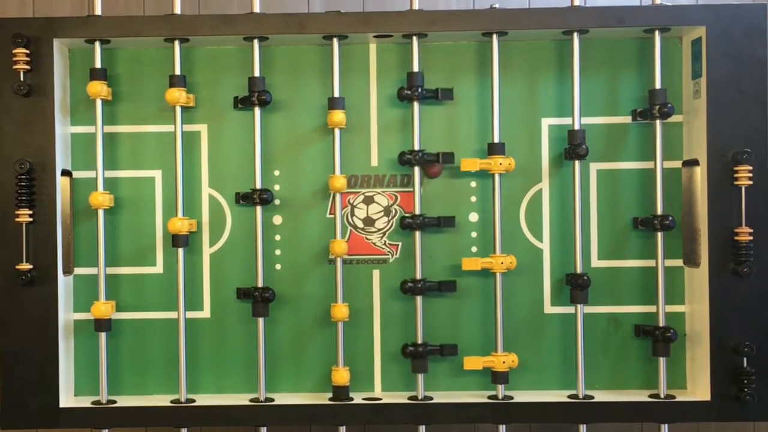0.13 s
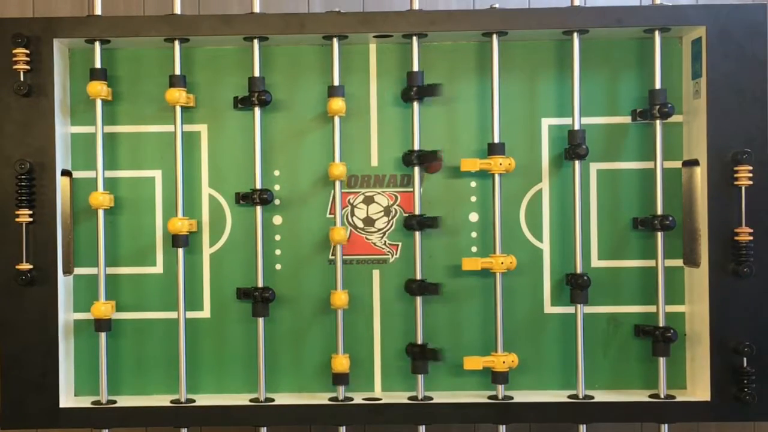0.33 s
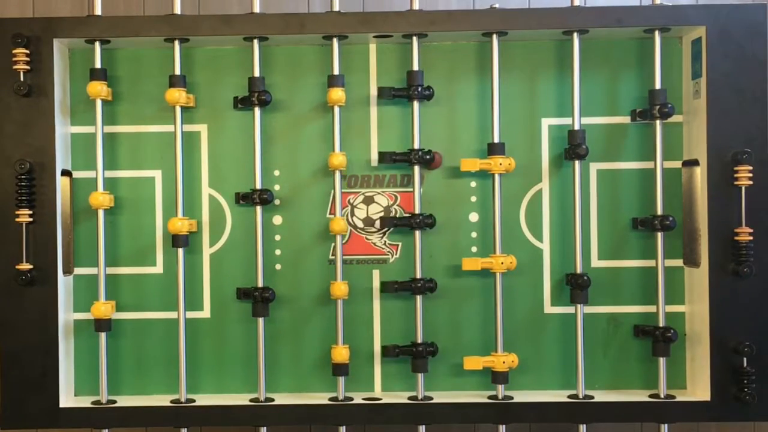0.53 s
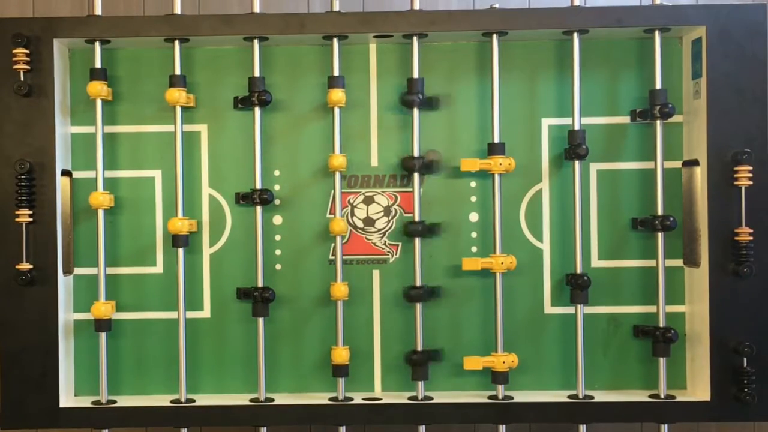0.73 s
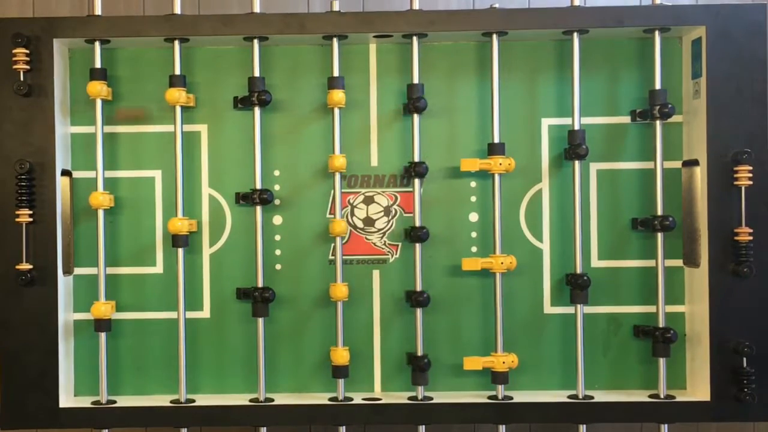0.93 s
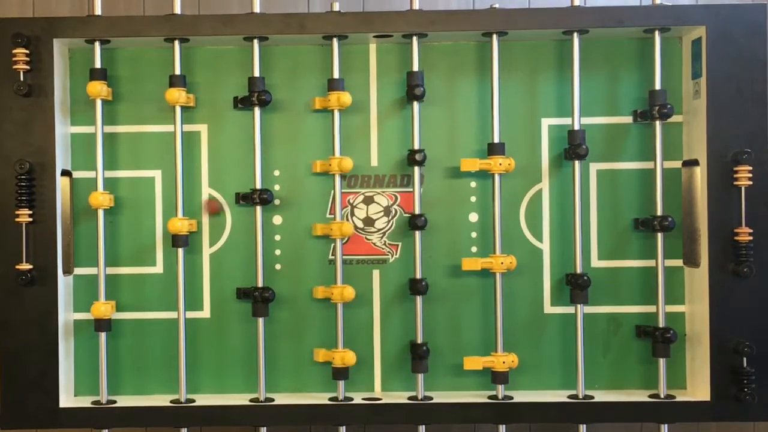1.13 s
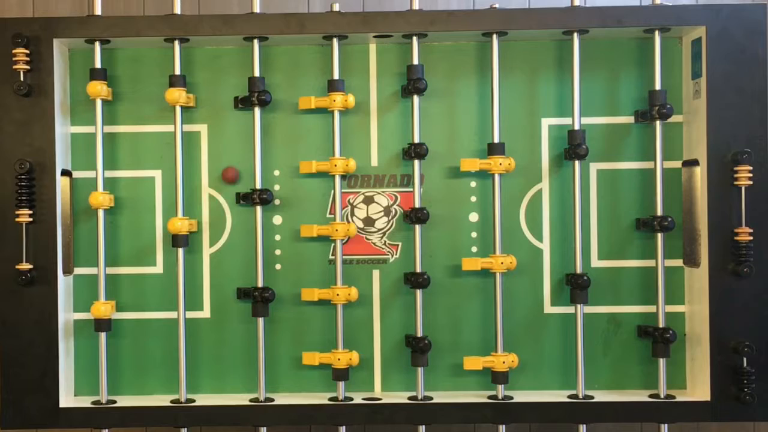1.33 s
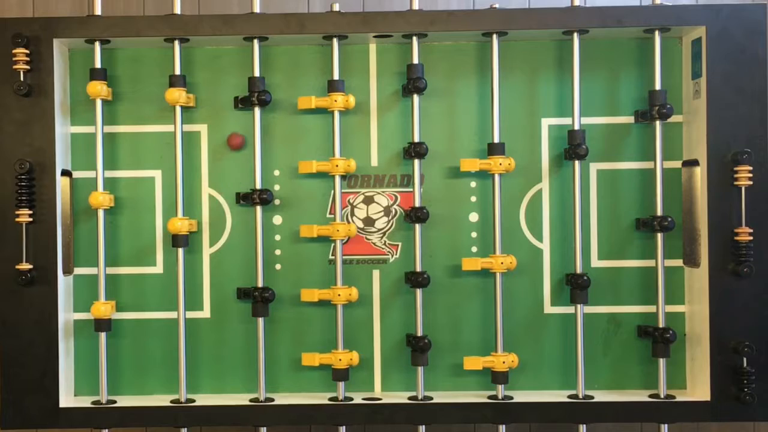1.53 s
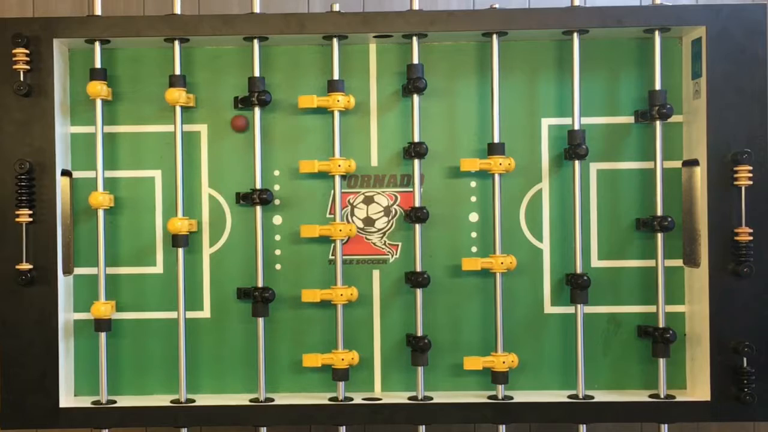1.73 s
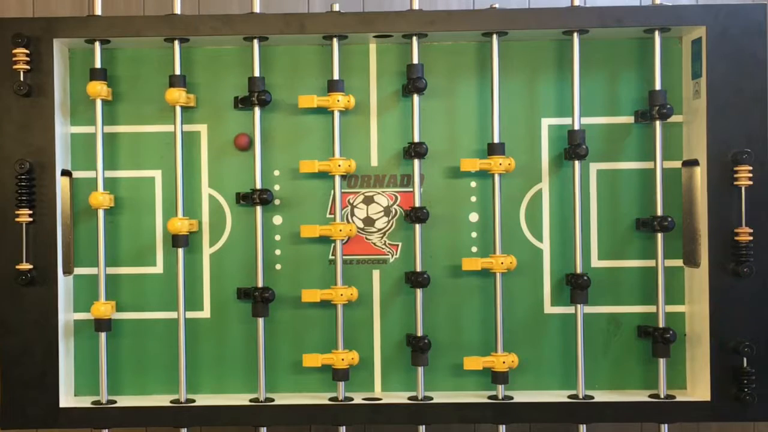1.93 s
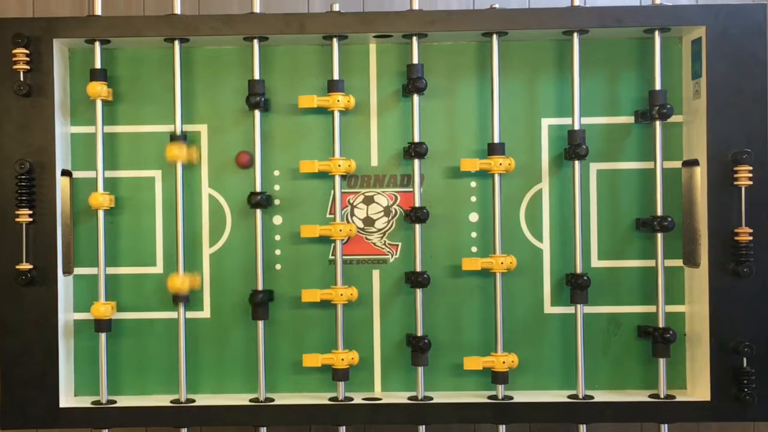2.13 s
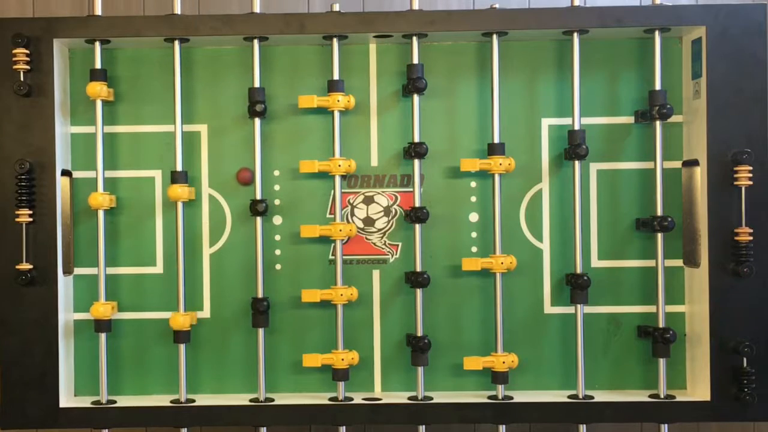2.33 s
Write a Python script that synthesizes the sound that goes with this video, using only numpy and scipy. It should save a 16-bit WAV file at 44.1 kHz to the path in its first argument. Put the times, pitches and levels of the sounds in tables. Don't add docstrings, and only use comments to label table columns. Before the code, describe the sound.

A foosball shot cracks hard with a cabinet boom, then fading knocks bounce quickly to a roll

```python
import sys
import numpy as np
from scipy import signal
from scipy.io import wavfile
from scipy.ndimage import uniform_filter1d

SR = 44100
rng = np.random.default_rng(int(sys.argv[2]) if len(sys.argv) > 2 else 0)


def transcribe(signal):
    frames = np.atleast_2d(signal).T
    limited = np.clip(frames, -1, 1)
    pcm = np.round(limited * 32767).astype(np.int16)
    wavfile.write(sys.argv[1], SR, pcm)


def voltage_ratio(level):
    return 10 ** (np.asarray(level, float) / 20)


N = 109941

# (time [s], peak [dB], crack [dB], brightness [dB per octave], contact cut [Hz])
SHOT_BLOWS = [
    (0.7972, 1.995, -4.5, 0.67, 17770),
]
# (time [s], peak [dB], crack [dB], brightness [dB per octave], contact cut [Hz])
BLOCK_BLOWS = [
    (0.964, 0.998, -9, 0.3, 3980),
]
# (time [s], peak [dB], crack [dB], brightness [dB per octave], contact cut [Hz])
FIELD_BLOWS = [
    (1.068, -9.5, -31, 2.5, 3570),
    (1.216, -11, -14.5, 1, 2800),
    (1.3785, -13, -12.5, 0.4, 2500),
    (1.485, -16.5, -18.5, 0.8, 2410),
    (1.559, -22.5, -29, 1.2, 2250),
    (1.617, -22.5, -30, -0.7, 1890),
    (1.656, -27.5, -28, -2.5, 1760),
    (1.686, -32, -30, -5, 1720),
    (1.71, -38, -22.5, -4, 1706),
]

# (frequency [Hz], level [dB per Hz])
SHOT_COLOUR = [(60, -22), (150, -20), (280, -6), (500, -9), (2050, -22.5), (2630, -41), (3740, -23),
               (8770, -42), (16000, -55)]
# (frequency [Hz], level [dB per Hz])
BLOCK_COLOUR = [(100, -17.5), (300, -5), (900, -2), (1450, -3), (2300, -10), (3200, -6.5), (6000, -7.5),
                (16000, -27)]
# (frequency [Hz], level [dB per Hz])
FIELD_COLOUR = [(100, 4), (300, 4.5), (600, 5), (1200, 5.5), (2000, -2), (3000, -9.5), (4300, -17.5),
                (6500, -21), (16000, -31.5)]

# (frequency [Hz], level [dB], T60 [s])
CABINET_MODES = [(54.2, -7.5, 0.21), (383, -20, 0.15), (640, -19.5, 0.15), (191.1, -15.5, 0.202),
                 (252.6, -13, 0.09), (294, -13, 0.18), (439, -7.5, 0.02), (520, -18.5, 0.15),
                 (774, -18, 0.13), (1059, -18.5, 0.12), (4200, -18.5, 0.06), (3500, -24.5, 0.0089)]
# (frequency [Hz], level [dB], T60 [s])
FIGURE_MODES = [(270, -23, 0.051), (636, -21, .1), (860, -9.5, 0.066), (1129, -10.5, 0.047),
                (1263, -13, 0.085), (3300, -24, 0.025), (2970, -13.5, 0.011), (6300, -33, 0.02)]
# (frequency [Hz], level [dB], T60 [s])
FIELD_MODES = [(81.5, -20, 0.41), (220, -9, 0.078), (295.5, -12.5, 0.24), (389.6, -19.5, 0.24),
               (530.4, -12, 0.082), (586.2, -14.5, 0.22), (649, -17, 0.22), (843, -21, 0.18),
               (1065, -4.5, 0.03), (1270, -32, 0.087), (1386, -17.5, 0.18), (1724, -10, 0.035),
               (2060, -26, 0.028), (6760, -48.5, 0.18)]
# (frequency [Hz], T60 [s])
WOOD_DECAY = [(100, 0.3), (500, 0.018), (1500, 0.031), (4000, 0.013), (12000, 0.036)]
# (frequency [Hz], T60 [s])
ROOM_DECAY = [(60, 0.75), (300, 0.45), (1100, 0.44), (3000, 0.24), (8000, 0.31), (15000, 0.26)]
# (time [s], frequency
# [Hz], level [dB], T60 [s])
SHORT_RINGS = [(0.7976, 4110, -9, 0.024), (.802, 1956, -19, 0.061), (0.803, 3960, -14, 0.022),
               (.806, 576, -5, 0.062), (.808, 782, -9, 0.074), (.824, 457, -11.5, 0.053),
               (.826, 640, -10.5, 0.062), (.849, 520, -16.5, 0.086), (.853, 93.6, -14.5, 0.26),
               (0.879, 320, -17.5, 0.067), (0.887, 95, -19, .1), (.968, 1860, -22.5, .04),
               (0.9692, 2980, -15, 0.022), (0.973, 3300, -14.5, 0.022), (.976, 294, -17.5, 0.083),
               (1.069, 2330, -15, .03), (1.215, 2750, -21.5, 0.021), (1.2165, 570, -10.5, .04),
               (1.217, 1094, -9.5, 0.024), (1.22, 1940, -14.5, 0.031), (1.222, 2420, -21.5, .025),
               (1.239, 610, -15.5, 0.037), (1.38, 940, -17, 0.057), (1.384, 1790, -14, 0.032),
               (1.39, 796, -18.5, .04), (1.397, 6500, -42, 0.017), (1.488, 1764, -25, .03)]

# (time [s], level [dB])
ROLL_LEVEL = [(1.45, -85), (1.56, -41.5), (1.68, -65), (1.76, -41.5), (1.85, -59), (2.0, -96)]
# (frequency [Hz], level [dB])
ROLL_TONE = [(100, -8), (300, 5), (700, -5.5), (1500, -10.5), (1900, -11.5), (3000, -34.5), (8000, -55)]

# (time [s], peak [dB], centre [Hz], length [s])
ROD_TICKS = [(0.399, -32.5, 612.6, 0.1), (.705, -48.5, 7500, 0.011), (.706, -54, 12500, .012),
             (.8, -26, 9160, 0.076), (0.801, -32, 12000, .07), (0.812, -36, 6500, .06),
             (0.911, -39, 4070, 0.038), (0.951, -21, 820, 0.32), (0.974, -22.5, 6100, .04),
             (1.025, -34.5, 14300, 0.035), (1.1541, -41, 14000, 0.045), (1.1545, -50, 10000, 0.03),
             (1.194, -27, 410, 0.1), (1.225, -47.5, 6500, 0.11), (1.384, -51, 6500, .12),
             (1.62, -32, 1350, .16), (1.623, -46, 3300, 0.037), (1.655, -48, 3300, 0.035),
             (1.741, -46, 4500, 0.034), (1.951, -56.5, 4500, 0.046), (1.963, -56, 7040, 0.042),
             (1.99, -50.5, 6500, 0.06), (1.992, -44, 3700, 0.061), (1.993, -46.5, 2600, 0.063),
             (1.996, -45, 1590, 0.07), (2, -40, 97.2, .1), (2.03, -38, 418, 0.26)]
# (time [s], level [dB])
SLIDE_LEVEL = [(0, -65), (.1, -64), (.21, -62), (.25, -75), (.34, -71), (.41, -65), (.5, -73), (.6, -85),
               (.72, -72), (.79, -56.5), (.85, -78.5), (1.94, -75), (2.04, -62), (2.13, -60.5),
               (2.25, -59.5), (2.35, -64), (2.39, -75), (2.49, -70)]
# (frequency [Hz], level [dB])
SLIDE_TONE = [(1470, -30.5), (2500, -3), (4760, -2.5), (6060, 4), (7530, -10), (9220, -4.5), (10300, -10),
              (12700, -9), (16000, -2.5)]
# (frequency [Hz], width [Hz], level [dB], loudest at [s])
BEARING_SQUEAKS = [(6100, 720, -1, 2.144), (6500, 450, -10, 2.22), (9350, 520, -5, 2.25),
                   (8500, 320, -4.5, 2.14), (12300, 560, -9, 2.17), (6270, 1100, -2, 0.43)]

# (time [s], level [dB])
HAND_LEVELS = [
    [(0.0, -28.5), (0.02, -33), (0.35, -51.5), (0.364, -44.5), (0.49, -48.5), (0.506, -52), (0.63, -52),
     (0.77, -42), (0.78, -37.5)],
    [(1.85, -48), (1.952, -46), (2.0, -38.5), (2.326, -49.5), (2.336, -41), (2.37, -49), (2.404, -44),
     (2.422, -51.5), (2.49, -46)],
]
# (frequency [Hz], level [dB])
HAND_TONE = [(15, -33), (25, -5.5), (81, 3), (134, -2), (156, -20), (324, -12.5), (624, -28), (1350, -26.5),
             (2500, -41), (3250, -81), (5500, -120)]
# (frequency [Hz], level [dB])
AIR_TONE = [(15, -28), (25, 1), (145, -8.5), (317, -17), (354, -6), (405, -20), (734, -20), (1020, -30),
            (16000, -57)]

STRIKE_DB = 2


def knocks(events, modes, colour, dense_db, tail_db, longer, crack_hz, rise_s):
    out = np.zeros(N)
    lag = int(.0055 * SR)
    echo_db = -6
    tail_follows = 0.88
    spread_db = STRIKE_DB if len(events) > 1 else 0
    for s, db, crack_db, tilt_db, cut_hz in events:
        direct = wood_crowd(colour, dense_db, tilt_db, cut_hz) + voltage_ratio(crack_db) * contact_crack(crack_hz)
        echo = np.r_[np.zeros(lag), direct[:-lag]]
        add(out, s, voltage_ratio(db) * (direct + voltage_ratio(echo_db) * echo))
        add(out, s, voltage_ratio(db) * named_modes(modes, spread_db, rise_s))
        add(out, s, voltage_ratio(tail_follows * db + tail_db) * tail(colour, tilt_db, cut_hz, longer))
    return out


def contact_crack(crack_hz):
    t = np.arange(SR // 14) / SR
    band = signal.butter(2, [crack_hz * .3, crack_hz], "band", fs=SR, output="sos")
    return signal.sosfilt(band, rng.standard_normal(len(t)) * np.exp(-t / .00045))


def wood_crowd(colour, dense_db, tilt_db, cut_hz):
    t = np.arange(SR // 14) / SR
    strength, lateness, detune, sign = rng.standard_normal((4, 200))
    hz = np.geomspace(100, 16500, 200) * (1 + .02 * detune)
    level = dense_db + struck(colour, hz, tilt_db, cut_hz) + 3 * np.log2(hz / 1000) + STRIKE_DB * strength
    late = np.maximum(t - .0025 * np.abs(lateness)[:, None], 0)
    crowd = rings(hz, voltage_ratio(level) * np.sign(sign), at_hz(WOOD_DECAY, hz), late)
    return crowd * (1 - (t / t[-1]) ** 4)


def named_modes(modes, spread_db, rise_s):
    t = np.arange(SR // 3) / SR
    hz, db, t60 = np.transpose(modes)
    strength, sign = rng.standard_normal((2, len(hz)))
    gain = voltage_ratio(db + spread_db * strength) * np.sign(sign)
    late = np.maximum(t - 0.29 / hz[:, None], 0)
    return rings(hz, gain, t60, late) * np.minimum(t / rise_s, 1)


def tail(colour, tilt_db, cut_hz, longer):
    t = np.arange(SR // 3) / SR
    out = 0
    edges = 60 * 2 ** np.arange(0, 8.3, .25)
    white = rng.standard_normal((2, len(t)))
    for k, (low, high) in enumerate(zip(edges, edges[1:])):
        hz = np.sqrt(low * high)
        band = signal.sosfilt(signal.butter(2, [low, high], "band", fs=SR, output="sos"), white[k % 2])
        decay = np.exp(-np.log(1000) * t / (longer * at_hz(ROOM_DECAY, hz)))
        out = out + voltage_ratio(struck(colour, hz, tilt_db, cut_hz)) * band * decay
    return out * np.minimum(t / 0.0032, 1) * (1 - (t / t[-1]) ** 4)


def struck(colour, hz, tilt_db, cut_hz):
    step = -14.5 / (1 + (cut_hz / hz) ** 14)
    return at_hz(colour, hz) + tilt_db * np.log2(np.maximum(hz, 500) / 1000) + step


def rings(hz, gain, t60, late):
    decay = np.exp(-np.log(1000) * late / t60[:, None])
    return gain @ (np.sin(2 * np.pi * hz[:, None] * late) * decay)


def boom():
    out, t = np.zeros(N), np.arange(SR // 5) / SR
    start_hz, end_hz, sag_s = 270, 82, .008
    hold_s, fade_s = .045, .013
    cycles = end_hz * t + (start_hz - end_hz) * sag_s * (1 - np.exp(-t / sag_s))
    add(out, .7992, voltage_ratio(-2.5) * np.sin(2 * np.pi * cycles) / (1 + np.exp((t - hold_s) / fade_s)))
    return out


def short_rings():
    out, t = np.zeros(N), np.arange(SR // 6) / SR
    for s, hz, db, t60 in SHORT_RINGS:
        swell = np.minimum(t * hz / 1.2, 1)
        add(out, s, voltage_ratio(db) * np.sin(2 * np.pi * hz * t) * voltage_ratio(-60 * t / t60) * swell)
    return out


def swing():
    t = np.arange(N) / SR - .7975
    grow_s, fall_s = 0.008, .003
    swell = np.exp(-np.abs(t) / np.where(t < 0, grow_s, fall_s))
    return -voltage_ratio(-13) * np.cos(2 * np.pi * 95 * t) * swell


def roll():
    return in_time(ROLL_LEVEL) * noise(ROLL_TONE, patchy_db=4)


def ticks():
    out, t = np.zeros(N), np.arange(SR // 8) / SR
    for s, db, hz, length in ROD_TICKS:
        band = signal.butter(2, [hz * 0.76, min(hz * 1.14, 19000)], "band", fs=SR, output="sos")
        rattle_db = 5 * np.repeat(rng.standard_normal(len(t) // 64 + 1), 64)[:len(t)]
        grit = rng.standard_normal(len(t)) * voltage_ratio(rattle_db)
        shape = np.exp(-3 * t / length) * np.minimum(t / (.06 * length), 1)
        add(out, s, voltage_ratio(db) * signal.sosfilt(band, grit * shape))
    return out


def rods():
    hiss = noise(SLIDE_TONE, patchy_db=.5)
    for hz, width_hz, db, s in BEARING_SQUEAKS:
        band = signal.butter(1, [hz - width_hz / 2, hz + width_hz / 2], "band", fs=SR, output="sos")
        squeak = signal.sosfilt(band, rng.standard_normal(N))
        swell = np.exp(-((np.arange(N) / SR - s) / 0.11) ** 2)
        hiss = hiss + voltage_ratio(db) * swell * squeak / squeak.std()
    return in_time(SLIDE_LEVEL) * hiss


def hands():
    return in_time(HAND_LEVELS[0] + HAND_LEVELS[1]) * noise(HAND_TONE, patchy_db=1.5)


def room_air():
    return voltage_ratio(-47) * noise(AIR_TONE, patchy_db=.8)


def noise(colour, patchy_db):
    out = 0
    white = rng.standard_normal((2, N))
    edges = 22 * 2 ** np.arange(0, 9.9, .5)
    points = [(colour[0][0] * .7, -60)] + list(colour)
    for k, (low, high) in enumerate(zip(edges, edges[1:])):
        flicker = np.interp(np.arange(N), np.linspace(0, N, 50), rng.standard_normal(50))
        band = signal.sosfilt(signal.butter(2, [low, high], "band", fs=SR, output="sos"), white[k % 2])
        level = at_hz(points, np.sqrt(low * high))
        out = out + voltage_ratio(level + patchy_db * flicker) * band
    return out / out.std()


def at_hz(points, hz):
    table_hz, value = np.transpose(points)
    return np.interp(np.log(hz), np.log(table_hz), value)


def in_time(rows):
    return voltage_ratio(np.interp(np.arange(N) / SR, *np.transpose(rows)))


def add(out, s, sound):
    i = int(s * SR)
    out[i:i + len(sound)] += sound[:N - i]


def scene():
    shot = knocks(SHOT_BLOWS, CABINET_MODES, SHOT_COLOUR, dense_db=-8, tail_db=9.5, longer=0.98,
                  crack_hz=7100, rise_s=0.0005)
    block = knocks(BLOCK_BLOWS, FIGURE_MODES, BLOCK_COLOUR, dense_db=-25, tail_db=-5, longer=1,
                   crack_hz=11000, rise_s=0.00089)
    bounces = knocks(FIELD_BLOWS, FIELD_MODES, FIELD_COLOUR, dense_db=-22, tail_db=-6.5, longer=1,
                     crack_hz=15400, rise_s=0.002)
    ball = shot + block + bounces + roll()
    table = boom() + short_rings() + swing() + ticks() + rods() + hands()
    return (ball + table + room_air())[None]


def roll_off(x):
    return signal.sosfilt(signal.butter(12, 16800, fs=SR, output="sos"), x)


def record(dry):
    x = signal.sosfilt(signal.butter(3, 38, "high", fs=SR, output="sos"), dry)
    limit_db, release_db_per_s, ceiling = -.5, 199, .99
    fall = release_db_per_s * np.arange(N) / SR
    excess_db = np.maximum(20 * np.log10(np.abs(x[0]) + 1e-9) - limit_db, 0)
    over = np.maximum.accumulate(excess_db + fall) - fall
    x = x * voltage_ratio(-uniform_filter1d(over, size=61))
    x = x / (1 + np.abs(x / ceiling) ** 8) ** .125
    x = signal.sosfilt(signal.cheby2(10, 26, 15900 * 1.008, fs=SR, output="sos"), x)
    return roll_off(x)


dry = scene()
out = record(dry)
transcribe(out)
```